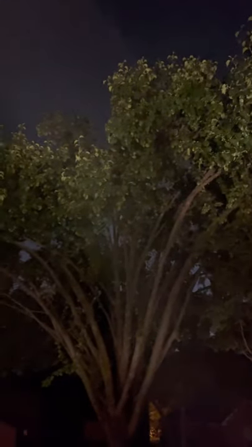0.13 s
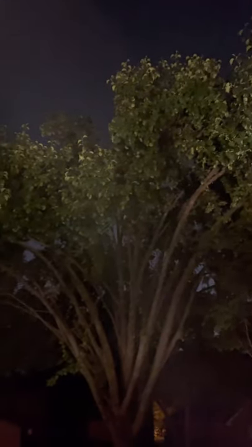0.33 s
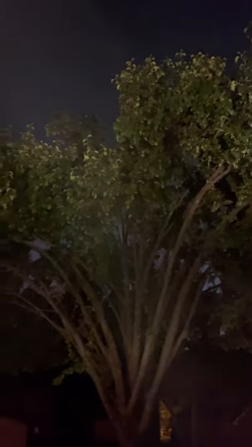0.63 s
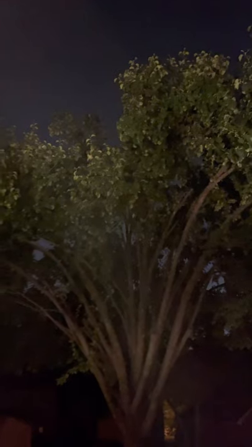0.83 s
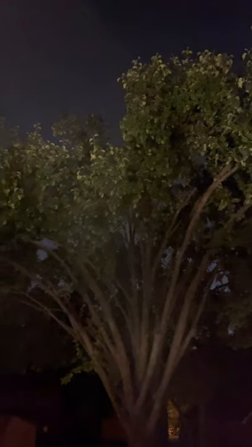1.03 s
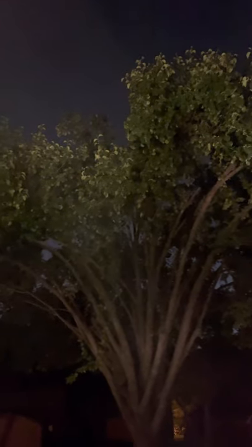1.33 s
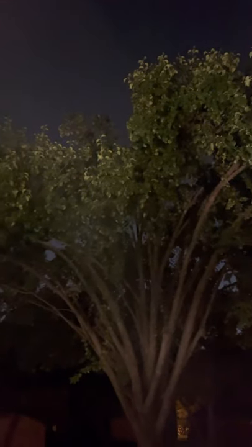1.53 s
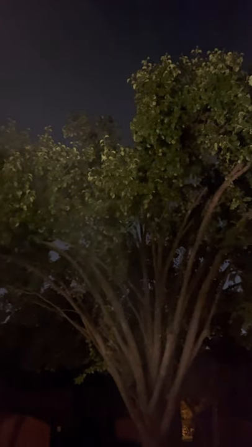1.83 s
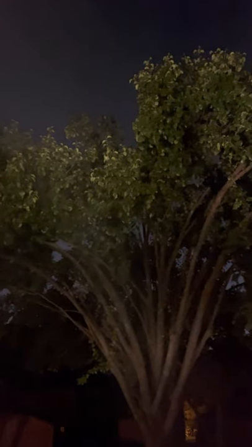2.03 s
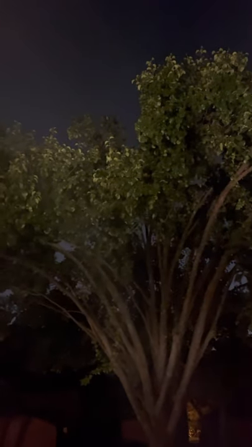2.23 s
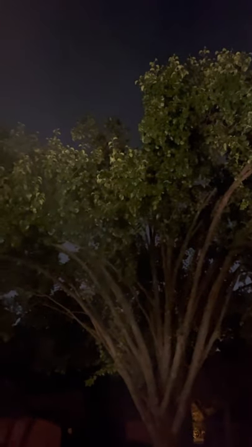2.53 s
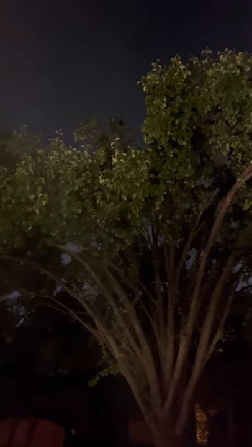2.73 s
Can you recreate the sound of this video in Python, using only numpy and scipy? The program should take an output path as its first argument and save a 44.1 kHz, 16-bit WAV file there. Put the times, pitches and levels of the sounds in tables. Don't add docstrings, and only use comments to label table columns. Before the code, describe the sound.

Katydids rasp in a dense pulsing chorus from night trees, over a faint low hum

```python
import sys
import numpy as np
from scipy import signal
from scipy.fft import rfft, irfft, next_fast_len
from scipy.io import wavfile
from scipy.ndimage import map_coordinates

SR = 44100
rng = np.random.default_rng(int(sys.argv[2]) if len(sys.argv) > 2 else 0)


def inscribe(sig):
    pcm = np.round(np.clip(np.atleast_2d(sig).T, -1, 1) * 32767)
    wavfile.write(sys.argv[1], SR, pcm.astype(np.int16))


def volts_from_decibels(level):
    exponent = np.asarray(level, float) / 20
    return 10 ** exponent


N = 127008

# t/s, main level/dB, low level/dB, upper level/dB, shrill level/dB
NEAR_STROKES = [(0.07, -50.5, -50, -48.5, -48.5), (0.155, -51, -51, -48, -47),
                (0.255, -46, -53.5, -45, -44), (0.371, -49.5, -58, -46.5, -49),
                (0.513, -39.5, -47, -39, -42), (0.633, -41.5, -49.5, -44.5, -46),
                (0.765, -49, -58, -64, -74), (0.852, -42, -46, -41.5, -44.5), (0.989, -40, -45, -40, -41),
                (1.119, -49.5, -53, -46.5, -46), (1.264, -44, -51, -46, -47),
                (1.392, -45.5, -56, -45, -47.5), (1.492, -40, -49, -43.5, -44),
                (1.616, -44, -48, -44.5, -45.5), (1.724, -43.5, -47, -41.5, -44),
                (1.86, -48.5, -51, -46, -45), (1.973, -47, -51, -44.5, -46.5),
                (2.097, -41, -45.5, -41, -43), (2.21, -40, -47.5, -45.5, -46.5), (2.35, -53, -73, -53, -72),
                (2.433, -42, -48, -41, -42.5), (2.564, -44, -47, -42, -42.5), (2.704, -50.5, -55, -51, -47),
                (2.813, -43.5, -50, -42, -45)]
# lag in the stroke t/s, far chorus level/dB, flutter level/dB
GROUPS = [
    (-0.00088, -51.5, 0.9),
    (-0.015, -59.5, 1.15),
    (0.002, -48, -0.5),
    (0.0084, -55, 0.75),
]
STROKE_HALF_S, STROKE_SQUARENESS = 0.038, 1.73


def stroke_efforts():
    times, *near_levels = np.transpose(NEAR_STROKES)
    efforts = []
    for near_db, (lag, far_db, _) in zip(near_levels, GROUPS):
        near_power = bumps(times + lag, near_db, STROKE_HALF_S, STROKE_SQUARENESS)
        efforts.append(np.sqrt(volts_from_decibels(far_db) ** 2 + near_power))
    return efforts


# f/Hz, width f/Hz, level/dB
MAIN_MODES = [(2274, 104, -3), (2466, 126, -2), (2619, 89, -2.5), (2743, 89, 1), (2938, 153, -1),
              (3163, 97, -5.5)]
LOW_MODES = [(1653, 125, -3), (1835, 140, 3), (1932, 79, 3), (2066, 112, 5.5)]
UPPER_MODES = [(3917, 600, -6), (4167, 99, 2.5), (4345, 286, 0.5), (4756, 520, -3.5), (5295, 670, -7.5)]
SHRILL_MODES = [(9800, 1300, -9.5), (10260, 910, 1), (10986, 1130, 2.5), (12120, 830, -10)]


def wing_rasp(efforts):
    clicks = coloured(teeth(), depth_db=2, width_hz=70.06, life_s=0.06)
    flutter_per_s = 35
    shared_db = 1.07 * wobble(flutter_per_s)
    rasp = 0
    for modes, effort, (_, _, flutter_db) in zip(
            [MAIN_MODES, LOW_MODES, UPPER_MODES, SHRILL_MODES], efforts, GROUPS):
        flutter = volts_from_decibels(shared_db + flutter_db * wobble(flutter_per_s / 2))
        steady_rms = np.sqrt(np.mean(filtered(clicks, wing(modes)) ** 2))
        rasp = rasp + filtered(clicks * effort * flutter, wing(modes)) / steady_rms
    return rasp


def teeth():
    hit = rng.random((2, N)) < 7000 / SR
    sign = np.sign(rng.standard_normal((2, N)))
    scatter_db = 1 * rng.standard_normal((2, N))
    return hit * sign * volts_from_decibels(scatter_db)


THIN_HZ, THIN_S = 110.1, 0.045
# f/Hz, level/dB
LEAF_SPECTRUM = [(1000, -120), (1400, -3), (3500, 9), (6200, -5.5), (7800, -9.5), (10000, -1), (12800, -9),
                 (15000, -30)]


def leaf_rasp(upper_effort):
    noise = hiss(lambda hz: volts_from_decibels(along(LEAF_SPECTRUM, hz)))
    return volts_from_decibels(-49) * coloured(noise, 6, THIN_HZ, THIN_S) * unit(upper_effort) ** 0.4


# f/Hz, level/dB
AIR_SPECTRUM = [(11500, -38), (12600, 10), (13400, 2), (14300, -4), (15500, 6), (17000, -3)]
# t/s, level/dB
AIR_SWELLS = [(.05, 1), (.27, -3), (.36, -4), (.76, -7), (.9, 1), (1.15, -2), (1.25, -9), (1.48, -5),
              (1.65, -3), (1.93, 2), (2.05, -2), (2.3, -5), (2.45, -1), (2.55, -3), (2.67, -1), (2.8, -2)]


def air_rasp(shrill_effort):
    lowest_hz = AIR_SPECTRUM[0][0]
    noise = hiss(lambda hz: volts_from_decibels(along(AIR_SPECTRUM, hz)) * (hz > lowest_hz))
    level = volts_from_decibels(-58 + np.interp(np.arange(N) / SR, *np.transpose(AIR_SWELLS)))
    return level * coloured(noise, 8, THIN_HZ, THIN_S) * unit(shrill_effort) ** 0.49


def katydids():
    efforts = stroke_efforts()
    main, low, upper, shrill = efforts
    return wing_rasp(efforts) + leaf_rasp(upper) + air_rasp(shrill)


# t/s, peak level/dB, f/Hz
CATCHES = [(0.0777, -27.5, 2880), (0.19, -36, 2490), (0.2264, -38, 4340), (0.2472, -31, 2370),
           (0.3548, -32, 2080), (0.3835, -32, 2930), (0.459, -40, 2850), (0.4825, -23, 2960),
           (0.5032, -14, 3150), (0.5987, -38, 2490), (0.7253, -30, 2800), (0.7463, -40, 2440),
           (0.7538, -42, 3120), (0.934, -37, 2010), (1.11, -36, 1770), (1.2501, -28, 2940),
           (1.3578, -43, 2060), (1.3633, -35, 2870), (1.4526, -25, 3140), (1.5744, -35, 1920),
           (1.8947, -29, 2640), (1.935, -26, 4340), (1.972, -28, 3020), (2.064, -31, 3060),
           (2.0727, -32, 2980), (2.18, -32, 2590), (2.1944, -30, 2780), (2.389, -35, 2750),
           (2.4134, -36, 1870), (2.5097, -40, 2890), (2.5282, -30, 1830), (2.6269, -34, 4300),
           (2.7352, -41, 2990), (2.7786, -23.5, 3020), (2.8053, -18, 2910)]


def catches():
    level_db, t60_s, rise_s, width_hz, other_side = -13.5, 0.053, 0.0017, 450, 0.25
    out = np.zeros(N + SR)
    t = np.arange(SR // 16) / SR
    for start, db, hz in CATCHES:
        burst = rng.standard_normal(len(t))
        ring = signal.lfilter(*signal.iirpeak(hz, hz / width_hz, SR), burst)
        envelope = volts_from_decibels(db + level_db - 60 * t / t60_s) * (1 - np.exp(-t / rise_s))
        out[round(start * SR):][:len(t)] += envelope * unit(ring)
    return out[:N] * np.array([[1], [other_side]])


# t/s, f/Hz, level/dB
SINGLE_CHIRPS = [(0.011, 2730, -52), (.267, 1770, -55), (.279, 2630, -61), (.36, 2076, -47.5),
                 (.386, 2946, -45.5), (.502, 1971, -44), (.624, 1863, -49), (.659, 2760, -51),
                 (.763, 3168, -45), (.839, 3020, -47), (1.007, 4700, -43), (1.124, 1800, -54.5),
                 (1.264, 3000, -44), (1.364, 2050, -50.5), (1.391, 2853, -45), (1.458, 3140, -46.5),
                 (1.483, 1847, -48.5), (1.58, 1958, -50), (1.69, 3150, -49), (.525, 2900, -47),
                 (1.649, 2760, -48), (1.853, 1743, -52.5), (1.893, 2606, -49), (1.973, 3026, -44),
                 (2.058, 1950, -49.5), (2.074, 2970, -47), (2.209, 2830, -68), (2.255, 4230, -63),
                 (2.432, 1878, -46.5), (2.534, 1825, -52.5), (2.583, 2580, -44.5), (2.811, 2870, -43.5),
                 (2.824, 4460, -63)]


def single_singers():
    return sum(chirp(*row) for row in SINGLE_CHIRPS)


def chirp(centre_s, hz, db):
    swell_s, width_hz, sag_hz_per_s, steady = 0.021, 63, 2520, 0.76
    t = np.arange(-4096, 4096) / SR
    swell = np.exp(-np.abs(t / swell_s) ** 3 / 2)
    noise = rng.standard_normal((2, 2, len(t)))
    rough = signal.lfilter(*signal.butter(2, width_hz, fs=SR), noise)
    shake = steady * np.array([[1], [0]]) + (unit(rough[0]) + 1j * unit(rough[1])) / 2
    shake = shake / np.sqrt(np.mean(np.abs(shake * swell) ** 2) / np.mean(swell ** 2))
    carrier = np.exp(2j * np.pi * (hz - sag_hz_per_s * t / 2) * t)
    out = np.zeros((2, N + SR))
    out[:, round(centre_s * SR):][:, :len(t)] = np.sqrt(2) * volts_from_decibels(db) * swell * (shake * carrier).real
    return out[:, len(t) // 2:][:, :N]


# t/s, level/dB
SCRATCH_CALLS = [(.385, -56), (.512, -54.5), (1.005, -66), (1.27, -55), (1.402, -55), (1.49, -71),
                 (1.73, -61), (1.99, -59), (2.105, -52.5), (2.44, -71), (2.565, -64), (2.82, -64)]
# f/Hz, width f/Hz, level/dB
SCRATCH_MODES = [
    (6280, 4700, 4),
    (8380, 2500, 2),
]


def scratchy_singer():
    times, levels_db = np.transpose(SCRATCH_CALLS)
    effort = np.sqrt(bumps(times, levels_db, STROKE_HALF_S, STROKE_SQUARENESS))
    return effort * unit(filtered(teeth(), wing(SCRATCH_MODES)))


# f/Hz, likeness (0 to 1)
TREE_LIKENESS = [(1500, 0.99), (2100, 0.73), (2800, 0.2), (4600, 0.47), (5800, 1), (7400, 0.8),
                 (8600, 0.94), (13200, 1), (14600, 0.38), (15400, 0.95)]
# f/Hz, phase/radians
TREE_PHASE = [(1600, .1), (2600, .5), (3900, 1.1), (4700, 3.1), (5750, 6.2), (6400, 6.4), (7900, 9.3),
              (9500, 9.5), (11000, 11.2), (11900, 12.55), (13700, 12.7), (14900, 15.7)]
# f/Hz, level/dB
TREE_TILT = [(1600, 1.5), (2200, 1.5), (3000, -0.5), (4000, -0.6), (4900, -2.5), (5700, -0.1)]


def trees():
    insects = katydids() + catches() + single_singers() + scratchy_singer()
    return ports(insects, TREE_LIKENESS, TREE_PHASE, TREE_TILT)


# t/s, f/Hz, level/dB
FAR_KNOCKS = [
    (0.294, 620, -50.5),
]


def knocks():
    t60_s, rise_s, pan_db = 0.05, 0.012, 19
    t = np.arange(N) / SR
    out = 0
    for peak_s, hz, db in FAR_KNOCKS:
        rise = np.clip((t - peak_s) / rise_s + 1, 0, 1)
        out = out + volts_from_decibels(db - 60 * np.abs(t - peak_s) / t60_s) * np.sin(2 * np.pi * hz * t) * rise
    return out * volts_from_decibels([[pan_db / 2], [-pan_db / 2]])


# f/Hz, level/dB, left over right level/dB
MACHINE_TONES = [(61.1, -53.5, 2.8), (120.1, -55, 2.8), (236, -62, 3.8), (298.3, -63, 9.2),
                 (373.7, -65.5, 19.4), (418.4, -70.5, 16), (484, -84, 4.3), (823, -72, 2.9), (998, -99, 8)]


def hum():
    out = 0
    for hz, db, pan_db in MACHINE_TONES:
        pan = np.array([[pan_db / 2], [-pan_db / 2]])
        level = volts_from_decibels(db + 1.5 * wobble(8.8) + pan)
        phase = 2 * np.pi * np.cumsum(hz + 3.53 * wobble(13)) / SR
        out = out + level * np.sqrt(2) * np.sin(phase)
    return out


# f/Hz, level/dB
TOWN_SPECTRUM = [(13, -40), (22, -11), (54, 0), (120, -0.5), (200, -5.5), (295, -13), (323, -14),
                 (372, -13.5), (502, -17), (1500, -23), (1950, -109), (3300, -120)]
# f/Hz, likeness (0 to 1)
TOWN_LIKENESS = [(100, 1), (300, 0.86), (480, 0.16), (800, 0.88), (1100, 0.092), (1500, 0.55)]
# f/Hz, phase/radians
TOWN_PHASE = [(350, .05), (550, 1.9), (900, 1.6), (1400, 0.45)]
# f/Hz, level/dB
TOWN_TILT = [(60, 4), (160, 2.5), (270, 6.5), (450, 4), (730, 9.5), (1190, -1.2)]


def town():
    low_cut_hz = 32.6
    pair = hiss(lambda hz: volts_from_decibels(along(TOWN_SPECTRUM, hz)) / (1 + (low_cut_hz / (hz + 1)) ** 8))
    return volts_from_decibels(-45.5 + 0.77 * wobble(3.72)) * ports(pair, TOWN_LIKENESS, TOWN_PHASE, TOWN_TILT)


def unit(x):
    return x / np.sqrt(np.mean(x ** 2) + 1e-20)


def along(points, hz):
    f, v = np.transpose(points)
    return np.interp(np.log(hz + 1), np.log(f + 1), v)


def wobble(rate):
    return map_coordinates(rng.standard_normal(400), [np.arange(N) * rate / SR])


def filtered(x, response):
    m = next_fast_len(N + SR // 4)
    return irfft(rfft(x, m) * response(np.fft.rfftfreq(m, 1 / SR)), m)[..., :N]


def hiss(response):
    return unit(filtered(rng.standard_normal((2, N)), response))


def wing(modes):
    def response(f):
        total = 0
        for k, (centre, width, db) in enumerate(modes):
            once = 1j * f * width / (centre * centre - f * f + 1j * f * width)
            total = total + volts_from_decibels(db) * once ** 2 * (-1) ** k
        return total
    return response


def bumps(times, levels_db, half_s, shape):
    t = np.arange(0, N + 64, 64) / SR
    swells = np.exp(-np.abs((t - np.asarray(times)[:, None]) / half_s) ** shape)
    return np.interp(np.arange(N) / SR, t, volts_from_decibels(levels_db) ** 2 @ swells)


def coloured(pair, depth_db, width_hz, life_s):
    z = signal.stft(pair, nperseg=1024, noverlap=768)[2]
    bin_hz, frame_s = np.arange(z.shape[1]) * SR / 1024, np.arange(z.shape[2]) * 256 / SR
    hz, t = np.meshgrid(bin_hz, frame_s, indexing="ij")
    field = map_coordinates(rng.standard_normal((400, 150)), [hz / width_hz, t / life_s], mode="wrap")
    return unit(signal.istft(z * volts_from_decibels(depth_db * field), nperseg=1024, noverlap=768)[1][:, :N])


def ports(pair, alike, lead, balance):
    def side(sign):
        def response(hz):
            turn = np.arccos(np.clip(along(alike, hz), -1, 1)) / 2
            level = volts_from_decibels(sign * along(balance, hz) / 2)
            lag = np.exp(0.5j * sign * along(lead, hz))
            return level * lag * np.array([np.cos(turn), sign * np.sin(turn)])
        return filtered(pair, response).sum(axis=0)
    return np.array([side(1), side(-0.97)])


def scene():
    return trees() + knocks() + hum() + town()


def band_limit(x):
    return signal.sosfilt(signal.butter(12, 15760, fs=SR, output="sos"), x)


def record(dry):
    return band_limit(dry)


dry = scene()
out = record(dry)
inscribe(out)
```